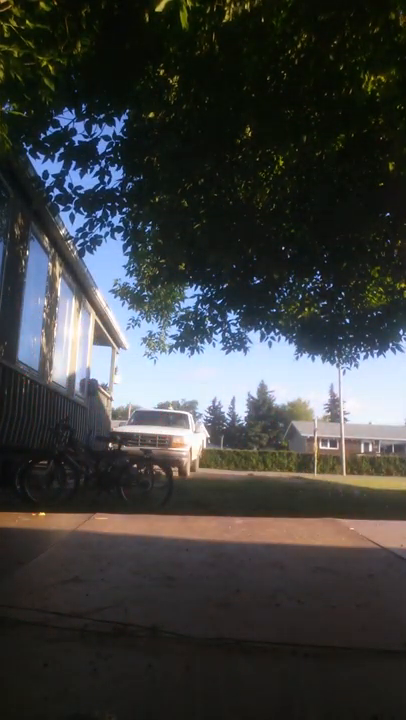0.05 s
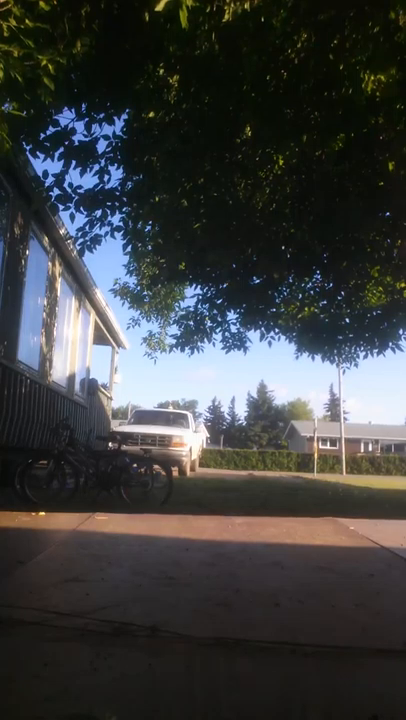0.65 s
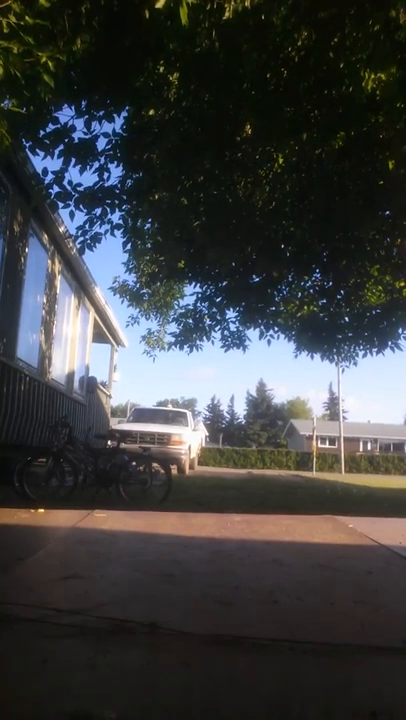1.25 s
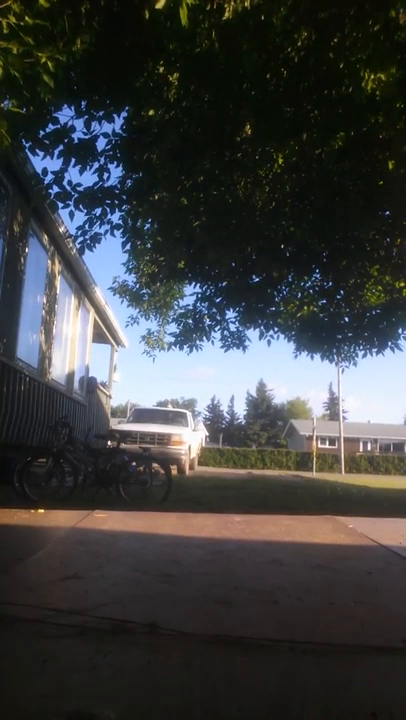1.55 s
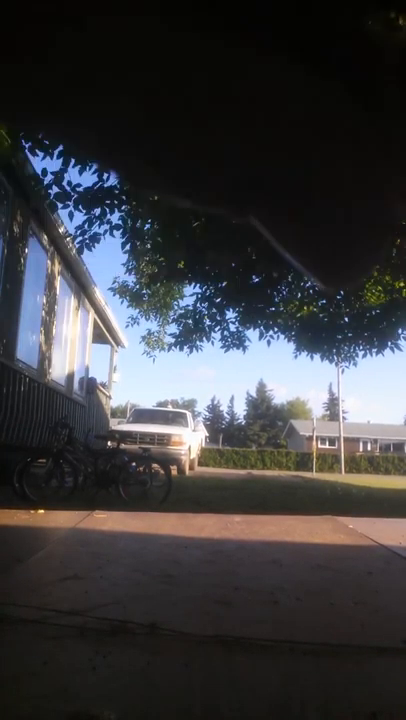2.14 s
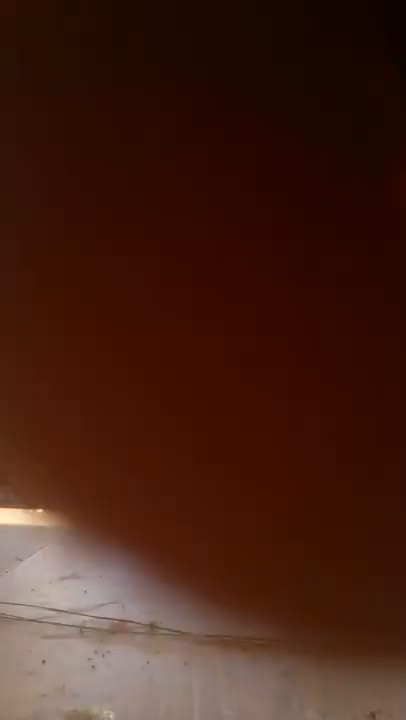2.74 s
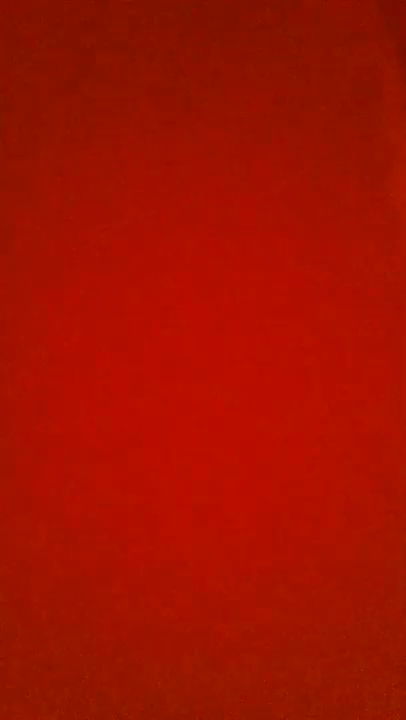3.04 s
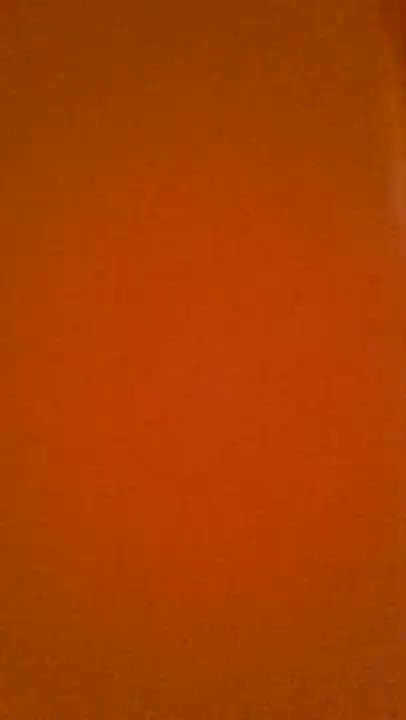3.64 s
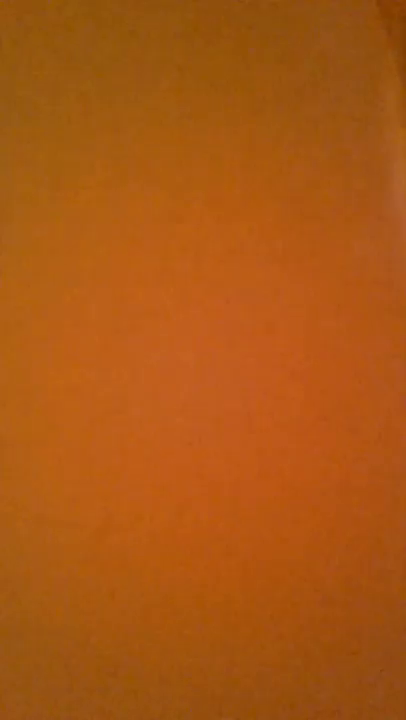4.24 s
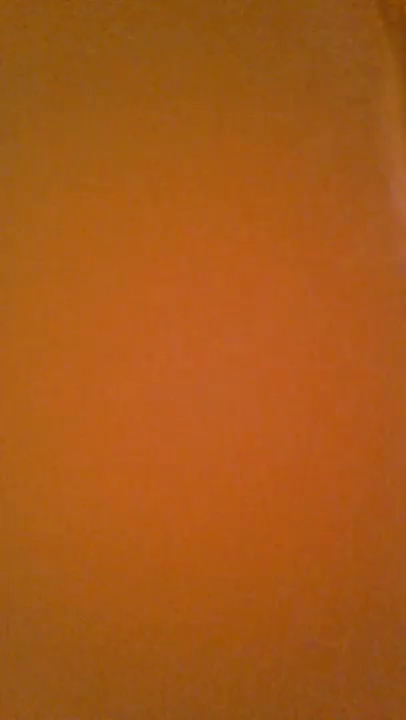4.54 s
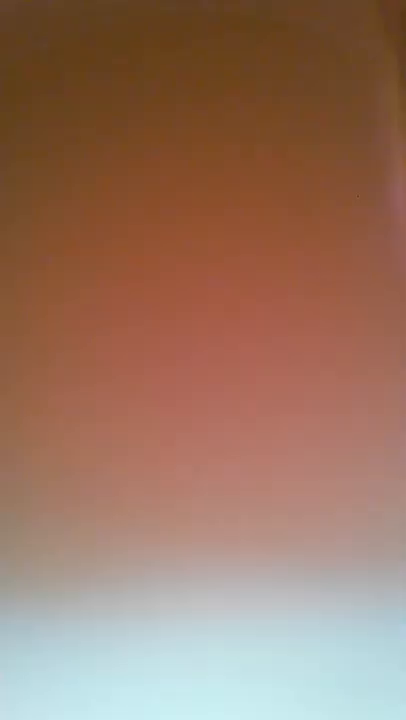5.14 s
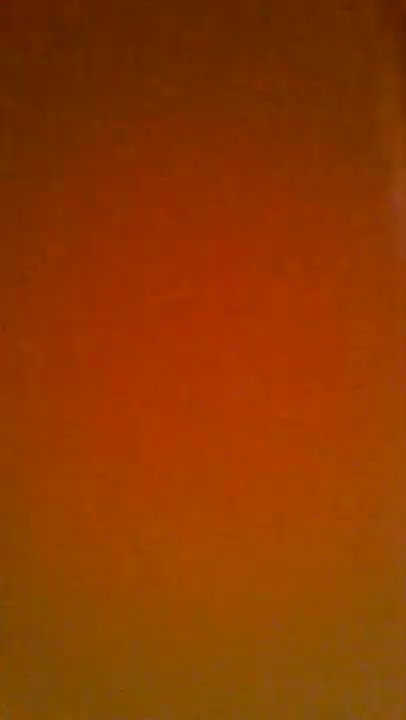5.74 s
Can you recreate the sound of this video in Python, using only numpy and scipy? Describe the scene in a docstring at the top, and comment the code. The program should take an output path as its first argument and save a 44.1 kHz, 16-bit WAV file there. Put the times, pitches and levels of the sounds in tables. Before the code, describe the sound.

Close handling noise on a phone: cloth rustle, a bump, skin rubbing and clicking, then loud wipes, while an engine idles far away.

```python
"""A phone stands on a driveway; a distant engine idles throughout. 0.1-2.4 s: a sleeve brushes its two
microphone ports, a far bird calls once, a hand bumps the case. 2.3-4 s: fingers touch and grip; skin
rubs and creaks, the case clicks and knocks. 4-5 s: two hard wipes cross the left port, the second
sounding an air pocket under the finger. From 5 s: the fingers settle and muffle the street."""
import sys
import numpy as np
from scipy import signal
from scipy.fft import rfft, irfft, next_fast_len
from scipy.io import wavfile
from scipy.ndimage import uniform_filter1d, map_coordinates

SR = 44100
rng = np.random.default_rng(int(sys.argv[2]) if len(sys.argv) > 2 else 0)


def transcribe(signal):
    """Save signal, clipped to [-1, 1], as a 16-bit WAV file at the path in sys.argv[1]."""
    frames = np.atleast_2d(signal).T
    limited = np.clip(frames, -1, 1)
    pcm = np.round(limited * 32767).astype(np.int16)
    wavfile.write(sys.argv[1], SR, pcm)


N = 264710
TIME_S = np.arange(N) / SR
SETTLED_S = 5.0  # fingers come to rest over the ports


# Wipe paths: t/s, hiss/dB, left minus right/dB, rumble/dB. All table levels are relative.
FIRST_WIPE = [(4.0, -37, 1.0, -37.5), (4.017, -23, 5.1, -45), (4.039, -36, 2.2, -41.5),
              (4.07, -21, 7.3, -43.5), (4.14, -22.3, 9.9, -47), (4.187, -29, 5, -37.5),
              (4.229, -24, 14, -42.5), (4.281, -43.5, 4.1, -48.5), (4.327, -44.5, 7.1, -39),
              (4.337, -33.5, 5.6, -44), (4.395, -50, 9.5, -61)]
SECOND_WIPE = [(4.398, -40, 12.0, -59), (4.414, -19.5, 17, -36), (4.474, -18.5, 15.5, -33),
               (4.51, -23.5, 15, -41.5), (4.564, -19.5, 22.5, -47), (4.61, -35.5, 7, -52.5),
               (4.7, -27.5, 13.5, -43), (4.754, -33, -2, -45), (4.804, -32.5, -4, -36),
               (4.844, -45, 14, -49), (4.882, -47, 0.5, -52.5), (4.976, -48.5, 5, -70),
               (5.015, -70, -3.0, -69)]
# Wipe spectra: f/Hz, left/dB, right/dB
FIRST_WIPE_SPECTRUM = [(500, -21, -28), (1400, -18, -15), (2170, -12.5, -21), (3200, -15, -9),
                       (4270, -20, -7), (4960, -6, -18), (6200, 1.5, 3), (7540, -10.5, -1), (8540, -11, -4),
                       (10600, -14, -5), (15000, -24, -19)]
SECOND_WIPE_SPECTRUM = [(500, -21, -8.5), (1400, -12.5, -13), (2120, -17.5, -3.5), (3200, -9.5, -10.5),
                        (4280, -8, -6), (5200, -0.5, -6.5), (6200, 1.5, -2), (7500, -6, -1.5),
                        (10900, -9, -8.5), (15000, -12, -17)]
def wipes():
    """Skin slides, then drags hard across the left port."""
    slide = rub(path_gains(FIRST_WIPE, lean_db=-0.5), FIRST_WIPE_SPECTRUM, grain_db=1.2, flutter_db=1.8)
    drag = rub(path_gains(SECOND_WIPE, lean_db=-5.5), SECOND_WIPE_SPECTRUM, grain_db=1, flutter_db=1.6)
    return slide + drag


# Grip path: t/s, hiss/dB, left minus right/dB, rumble/dB
GRIP_PATH = [(3.1, -54, 0.5, -46), (3.238, -47.5, -5, -48.5), (3.442, -41.5, 1.5, -49),
             (3.554, -44, -1.5, -44.5), (3.608, -37.5, -3, -37), (3.64, -43, -1, -42),
             (3.676, -36.2, -6.0, -42), (3.818, -38.5, 5, -40), (3.86, -43.5, -2, -43),
             (3.995, -45.5, 3, -59)]
# Light touches: t/s, length/s, hiss/dB, left minus right/dB, rumble/dB
FINGER_TOUCHES = [(2.347, 0.058, -41, -12, -48), (2.401, 0.25, -44, -8.5, -51),
                  (2.656, 0.082, -60, -7, -53), (2.799, 0.26, -50, -8, -58), (5.019, 0.073, -52, -6, -64),
                  (5.139, 0.088, -49, -11, -67), (5.212, 0.092, -45.5, -13.5, -71),
                  (5.294, 0.437, -57, -1.5, -75), (5.4, 0.033, -52, -28, -82),
                  (5.679, 0.16, -50.5, 2, -57.5), (5.828, 0.16, -45, -2.5, -52.5)]
# Skin spectra before and after settling: f/Hz, left/dB, right/dB
GRIP_SPECTRUM = [(500, -6, -31), (1400, -7.5, -7), (2180, -13.5, -5), (3600, -5, -5), (5200, -1.5, -3),
                 (6200, 2.5, -4.5), (6960, -2, 3.5), (8870, -10, -5), (11000, -16, -10.5),
                 (15100, -19, -15.5)]
SETTLED_SPECTRUM = [(800, -3.5, -22), (1150, -5, -19), (1830, -8, -17), (2210, 2.5, -9.5),
                    (3200, -5, -11.5), (5200, -5, -5.5), (6200, -2.5, -2), (7050, -3, 1), (8500, 1.5, -3),
                    (11000, -8, -10), (15000, -14, -14)]
def fingers(lean_db=1.5):
    """Fingers touch, work into a grip and settle; the pressed skin creaks."""
    touch = sum(contact_gains(hiss_db, pan_db, rumble_db, lean_db)[..., None]
                * envelope(start_s, length_s, attack_s=0.019, t60_s=0.12, sag_db=0.26)
                for start_s, length_s, hiss_db, pan_db, rumble_db in FINGER_TOUCHES)
    grip = path_gains(GRIP_PATH, lean_db=-6)
    settled = TIME_S > SETTLED_S
    gripping = rub(grip + touch * ~settled, GRIP_SPECTRUM, grain_db=1.5, flutter_db=2)
    settling = rub(touch * settled, SETTLED_SPECTRUM, grain_db=0.5, flutter_db=0.4)
    pressure = touch[1] + grip[0]  # touch rumble gain + grip hiss gain
    return gripping + settling + pressure * skin_creak()


# Sleeve swings: t/s, length/s, hiss/dB, rumble/dB
SLEEVE_SWINGS = [(0.108, 0.078, -44, -51), (0.276, 0.27, -52, -55), (0.56, 0.1, -48, -46),
                 (0.73, 0.13, -54, -81), (0.837, 0.08, -48, -48.5), (0.906, 0.055, -42, -37.5),
                 (1.015, 0.19, -40.5, -47.5), (1.327, 0.094, -48, -65), (1.453, 0.061, -43.5, -55),
                 (1.586, 0.15, -55, -56), (1.71, 0.079, -48, -54.5), (1.874, 0.13, -50.5, -50.5),
                 (2.019, 0.18, -48.5, -52), (2.23, 0.13, -51.5, -57)]
# Cloth spectrum at the ports: f/Hz, left/dB, right/dB
SLEEVE_SPECTRUM = [(493, -20, -12.5), (1200, -3.5, -10), (2050, -11, -7), (3200, -6.5, -7.5),
                   (4030, -7, -6), (4970, -3, -2.5), (6200, 1, -2), (7000, -6.5, 2), (8900, -12, -6),
                   (10700, -16, -10), (15100, -19.5, -15.5)]
def sleeve(pan_db=0, lean_db=5):
    """Cloth brushes both ports, starting softly and trailing off slowly."""
    gains = sum(contact_gains(hiss_db, pan_db, rumble_db, lean_db)[..., None]
                * envelope(start_s, length_s, attack_s=0.03, t60_s=0.37, sag_db=0.36)
                for start_s, length_s, hiss_db, rumble_db in SLEEVE_SWINGS)
    return rub(gains, SLEEVE_SPECTRUM, grain_db=1.5, flutter_db=1.6)


def rub(gains, spectrum, grain_db, flutter_db):
    """Friction hisses separately at each port, flutters with hand speed and rumbles through the case."""
    hiss_gain, rumble_gain = gains
    flutter = unit(amp(flutter_db * wobble(55)))
    hiss = cupped(coloured(friction(0, grain_db, slip_hz=1400), spectrum))
    return hiss_gain * flutter * hiss + rumble_gain * case_rumble()


# Case-borne spectrum: f/Hz, level/dB
RUMBLE_SPECTRUM = [(50, -38), (120, 1), (250, 4.5), (420, -3), (650, -3.5), (1300, -13.5), (2200, -15.5),
                   (4500, -33)]
def case_rumble(catches_per_s=45, catch_db=-7):
    """A sliding contact catches now and then; the case carries the low part to both ports."""
    chance, size = rng.random((2, N))
    catches = (chance < catches_per_s / SR) * (0.42 + size) * np.sign(noise(shared=0.6))
    force = friction(shared=0.51, grain_db=3.5, slip_hz=110) + amp(catch_db) * unit(catches)
    return through_case(cupped(coloured(force, RUMBLE_SPECTRUM)))


# Snag spectrum: f/Hz, level/dB
CREAK_SPECTRUM = [(200, -20), (600, 0), (1300, 1.5), (2300, -1.5), (4000, -13.5), (7000, 1.5), (15000, -33)]
def skin_creak(snags_per_s=110, spread_db=5):
    """Dry skin snags on a port rim: tiny ticks of uneven size."""
    snags = rng.random(N) < snags_per_s / SR
    sizes = amp(spread_db * np.clip(rng.standard_normal((2, N)), -2, 2))
    return amp(-8) * coloured(snags * sizes, CREAK_SPECTRUM)


# Soft bumps: t/s, left/dB, right/dB, f/Hz, t60/s
BUMPS = [(0.576, -20.5, -25, 75, 0.059), (0.639, -27.5, -31, 55, 0.11), (0.958, -2.5, -5.5, 98, 0.051),
         (.96, -11.5, -24, 212, 0.051), (1.002, -18.5, -24.5, 55.7, 0.17), (1.916, -23, -28, 58, 0.074),
         (2.366, -29, -15.5, 115, 0.027), (3.981, -14.5, -25, 194, 0.031), (4.727, -23, -16, 142, 0.044),
         (5.059, -33, -45, 71.7, 0.2)]
def bumps(attack_s=0.0021):
    """The whole phone rocks for a few slow cycles."""
    out, t = np.zeros((2, N)), np.arange(SR // 3) / SR
    for start_s, left_db, right_db, hz, t60_s in BUMPS:
        swing = -np.sin(2 * np.pi * hz * t) * amp(-60 * t / t60_s) * (1 - np.exp(-t / attack_s))
        add(out, start_s, stereo(left_db, right_db) * swing)
    return out


# Case ticks: t/s, left/dB, right/dB, f/Hz
CASE_CLICKS = [(0.5964, -31, -26, 5400), (0.9977, -17, -17, 2700), (1.743, -28, -23, 2970),
               (1.858, -32.5, -30, 7140), (2.0096, -26.5, -43, 6200), (2.3023, -17.5, -20, 5500),
               (2.506, -32, -21, 7700), (2.8714, -31, -31, 4960), (3.449, -23, -21.5, 2600),
               (3.465, -26.5, -25, 6860), (3.559, -28, -21.5, 2300), (3.602, -27, -13, 6300),
               (3.6808, -14.5, -12.5, 6850), (3.7502, -18, -18, 6800), (3.7635, -19, -20, 7000),
               (3.802, -20.5, -20.5, 5530), (3.8187, -17.5, -24, 6350), (3.898, -21.5, -27, 6400),
               (3.9416, -25, -27, 6200), (3.981, -10.5, -11.5, 7900), (4.045, -14, -26, 6690),
               (4.1814, -10.5, -9, 9000), (4.3408, -12, -32, 9600), (4.748, -18, -27, 2810)]
def clicks(t60_s=0.0086, tail_t60_s=0.015, tail_db=-20, width_ratio=0.31, skirt_db=-12, lowpass_hz=13000):
    """A snap and a tiny crack ring the case briefly at each tick's pitch."""
    out, t = np.zeros((2, N)), np.arange(SR // 40) / SR
    f = np.fft.rfftfreq(len(t), 1 / SR)
    snap = 2.4 * (t == 0)
    decay = amp(-60 * t / t60_s) + amp(tail_db - 60 * t / tail_t60_s)
    for start_s, left_db, right_db, hz in CASE_CLICKS:
        crack = snap + noise(shared=0.08, size=len(t)) * decay
        response = (resonance(f, hz, width_ratio * hz) + amp(skirt_db)) / (1 + (f / lowpass_hz) ** 2)
        tick = unit(irfft(rfft(crack) * response, len(t)))
        add(out, start_s, stereo(left_db, right_db) * tick)
    return amp(-16) * out


# Fingertip knocks: t/s, left/dB, right/dB, f/Hz
FINGER_KNOCKS = [(0.9658, -23.5, -30, 724), (1.8748, -31, -32.5, 510), (2.093, -24.5, -26, 940),
                 (2.0999, -28.5, -30, 800), (2.3026, -26.5, -31, 1450), (2.303, -30.5, -36, 540),
                 (2.873, -28, -30, 564), (3.4485, -26.5, -28, 1150), (3.54, -37, -33, 800),
                 (3.558, -37, -28, 900), (3.602, -25.5, -29, 310), (3.7783, -24, -27, 850),
                 (3.9849, -23, -29, 245), (4.0452, -24.5, -27.5, 307), (4.1838, -27, -37, 330),
                 (4.3103, -31.5, -33, 1340), (4.337, -30, -35, 260), (4.408, -24.5, -36, 283),
                 (4.411, -24, -35, 1400), (4.741, -24, -24, 250), (4.811, -30.5, -28.5, 550),
                 (5.077, -45, -46, 750), (5.244, -39, -39, 635), (5.778, -41.5, -48, 1290),
                 (5.8193, -39, -52, 1280), (5.8347, -38, -46, 1200), (5.8736, -34.5, -39, 520)]
def knocks(t60_s=0.0074, rattle_cycles=20, width_ratio=0.82, rattle_db=-2, skew_rad=0.62):
    """One heavily damped swing of the case plus a dull rattle, shorter at higher pitch."""
    out, t = np.zeros((2, N)), np.arange(SR // 12) / SR
    f = np.fft.rfftfreq(len(t), 1 / SR)
    for start_s, left_db, right_db, hz in FINGER_KNOCKS:
        phase = skew_rad * rng.standard_normal() * np.array([[1], [-1]])  # case flex: ports out of step
        swing = unit(np.sin(2 * np.pi * hz * t + phase) * amp(-60 * t / t60_s) * (1 - np.exp(-6 * hz * t)))
        chatter = noise(shared=0.69, size=len(t)) * amp(-60 * t * hz / rattle_cycles)
        rattle = unit(irfft(rfft(chatter) * resonance(f, hz, width_ratio * hz) ** 2, len(t)))
        add(out, start_s, stereo(left_db, right_db) * unit(swing + amp(rattle_db) * rattle))
    return amp(-11.5) * through_case(out)


# Finger scuffs: t/s, length/s, left/dB, right/dB, rasp/dB
FINGER_SCUFFS = [(0.577, 0.022, -41.5, -52, 6), (0.962, 0.014, -31.5, -33, 0),
                 (0.961, 0.051, -29.5, -29.5, -18), (1.446, 0.066, -34, -35.5, -30),
                 (2.091, 0.016, -33, -32, -7), (2.146, 0.023, -22, -21, -6.5),
                 (2.362, 0.045, -44, -36, -20), (4.007, 0.026, -29, -36, -30),
                 (4.403, 0.013, -27.5, -35, 0.5), (4.737, 0.01, -35, -28.5, 3)]
# Scuff hiss spectrum: f/Hz, level/dB
SCUFF_SPECTRUM = [(500, -9), (1400, -7), (3500, -7), (6300, 5.5), (9000, -3.5), (15000, -18.5)]
def scuffs():
    """Quick finger brushes: bright hiss over a dull, case-borne rasp."""
    hiss = coloured(friction(0, grain_db=1.5, slip_hz=810), SCUFF_SPECTRUM)
    rasp_hz_db = [(200, -5), (650, 13), (1500, 5.5), (3000, 1.5), (6000, -16)]
    rasp = through_case(coloured(noise(shared=1), rasp_hz_db))
    return sum(stereo(left_db, right_db) * (hiss + amp(rasp_db) * rasp)
               * envelope(start_s, length_s, attack_s=0.003, t60_s=0.037, sag_db=2)
               for start_s, length_s, left_db, right_db, rasp_db in FINGER_SCUFFS)


# Air pocket resonances: f/Hz, width/Hz, level/dB
POCKET_MODES = [(403, 135, -15.5), (890, 250, -13), (1700, 290, -2)]
# Tuning as the finger rolls: t/s, pitch ratio
POCKET_TUNING = [(4.5, 1.02), (4.6, 0.98), (4.78, 1.06)]
def air_pocket(peak_s=4.485, close_db_per_s=357, open_db_per_s=111):
    """Air under the finger resonates: the pocket closes fast, opens slowly and lingers with the drag."""
    out, t = np.zeros((2, N)), TIME_S - peak_s
    tuning = np.interp(TIME_S, *np.transpose(POCKET_TUNING))
    drag_gain, _ = path_gains(SECOND_WIPE, lean_db=0)
    linger = amp(-12) * drag_gain.mean(axis=0) * (t > 0)
    for hz, width_hz, db in POCKET_MODES:
        fade_db_per_s = open_db_per_s * np.sqrt(hz / POCKET_MODES[-1][0])
        swell = amp(-18.5 - np.maximum(-close_db_per_s * t, fade_db_per_s * t))
        out += amp(db) * np.maximum(swell, linger) * noise_band(hz * tuning, width_hz, shared=0.47)
    return stereo(0, -7) * out


# Fingertip drag: t/s, f/Hz, level/dB
GROAN_PATH = [(3.33, 270, -40), (3.39, 669.6, -41), (3.44, 600, -47), (3.455, 595, -30), (3.478, 580, -42)]
def groan():
    """Skin drags slowly over the case; one dull resonance rises as it presses in."""
    times_s, hz, db = np.transpose(GROAN_PATH)
    gain = uniform_filter1d(levels(np.transpose([times_s, db]))[0], size=200)
    return stereo(0, -3) * gain * noise_band(np.interp(TIME_S, times_s, hz), width_hz=190, shared=0.87)


# Rim resonances: f/Hz, width/Hz, left/dB, right/dB
RIM_MODES = [(1800, 280, -38, -35.5), (6350, 1460, -26, -22), (10000, 6000, -36, -24)]
def nail_ping(start_s=5.3195, length_s=0.0069):
    """A nail flicks the rim once, sounding a few high resonances."""
    out, size = np.zeros((2, N)), int(length_s * SR)
    for hz, width_hz, left_db, right_db in RIM_MODES:
        ring = unit(noise_band(np.full(N, hz), width_hz, shared=0.5)[:, SR:SR + size])
        add(out, start_s, stereo(left_db, right_db) * ring * np.hanning(size))
    return out


# Bird call: t/s, length/s, f/Hz, level/dB
BIRD_CALLS = [(0.758, 0.1, 4850, -52.5)]
def bird():
    """A far, thin, wavering whistle swells and fades."""
    out, waver = np.zeros((2, N)), 1 + 0.023 * wobble(260)
    for start_s, length_s, hz, db in BIRD_CALLS:
        size = int(length_s * SR)
        call = np.sin(2 * np.pi * hz * np.cumsum(waver[:size]) / SR) * np.hanning(size)
        add(out, start_s, stereo(db, db) * call)
    return out


# Engine tones: f/Hz, level/dB
ENGINE_TONES = [(54, -56.5), (107.7, -52.5), (150.7, -59.5)]
# Street murmur spectrum: f/Hz, level/dB
STREET_SPECTRUM = [(20, -26), (35, -30), (55, -0.5), (90, -0.5), (140, -2.5), (220, -10.5), (500, -18),
                   (800, -17), (1150, -25.5), (2000, -33.5), (8000, -52), (16000, -40)]
# The background sinks after the loud wipes, then recovers: t/s, level/dB
BACKGROUND_LEVEL = [(0, 2), (2.9, -2), (4.4, 1), (4.95, -10.5), (5.55, -13.5), (6, -4)]
def street():
    """A distant engine idles, slightly unsteady, over a low murmur."""
    engine_time_s = np.cumsum(1 + 0.006 * wobble(3.2)) / SR
    hum = sum(amp(db + 0.36 * wobble(4.3)) * np.sin(2 * np.pi * (hz * engine_time_s + rng.random()))
              for hz, db in ENGINE_TONES)
    murmur = amp(-50) * coloured(noise(shared=1), STREET_SPECTRUM)
    return stereo(1, -1) * levels(BACKGROUND_LEVEL) * (np.sqrt(2) * hum + murmur)


def port_hiss():
    """Faint hiss, dipping a little after the loud wipes."""
    return amp(-58) * levels(BACKGROUND_LEVEL) ** 0.36 * coloured(noise(shared=0.049), SLEEVE_SPECTRUM)


def covered(x, lowpass_hz=750):
    """Fingers settled over the ports pass only the lows."""
    shut = uniform_filter1d(1.0 * (TIME_S > SETTLED_S), size=4000)
    return (1 - shut) * x + shut * filtered(x, lambda f: 1 / (1 + (f / lowpass_hz) ** 10))


def through_case(x, dip_hz=928, width_hz=174, depth=0.45):
    """The case passes less between two of its resonances."""
    return filtered(x, lambda f: 1 - depth * resonance(f, dip_hz, width_hz))


def cupped(x, spread_db=2.5):
    """Gaps between hand and case keep changing, so resonances come and go."""
    spectra = signal.stft(x, nperseg=512)[2]
    patches = uniform_filter1d(rng.standard_normal(spectra.shape), size=4, axis=1)
    patches = uniform_filter1d(patches, size=14, axis=2)
    return unit(signal.istft(spectra * amp(spread_db * patches / patches.std()), nperseg=512)[1][:, :N])


def contact_gains(hiss_db, pan_db, rumble_db, lean_db, case_pan_share=0.68):
    """Gains (hiss, rumble) x (left, right); the case narrows the rumble's pan and leans it where pressed."""
    def ports(db, balance_db):
        pair = amp([balance_db / 2, -balance_db / 2])
        return 2 * amp(db) * pair / np.linalg.norm(pair, axis=0)
    return np.array([ports(hiss_db, pan_db), ports(rumble_db, lean_db + case_pan_share * pan_db)])


def path_gains(path, lean_db, fade_s=0.0058):
    """Contact gains of one unbroken rub, silent outside it."""
    times_s, *columns = np.transpose(path)
    gate = np.clip(np.minimum(TIME_S - times_s[0], times_s[-1] - TIME_S) / fade_s + 1, 0, 1)
    return contact_gains(*[np.interp(TIME_S, times_s, db) for db in columns], lean_db) * gate


def envelope(start_s, length_s, attack_s, t60_s, sag_db):
    """A stroke gathers speed, slows a little and dies away."""
    t = np.maximum(TIME_S - start_s, 0)
    attack = 1 - np.exp(-(t / attack_s) ** 2)
    return attack * amp(-sag_db * np.minimum(t / length_s, 1) - 60 * np.maximum(t - length_s, 0) / t60_s)


def friction(shared, grain_db, slip_hz):
    """Countless tiny slips: noise in uneven clumps."""
    return unit(noise(shared) * amp(grain_db * wobble(slip_hz)))


def noise_band(hz, width_hz, shared):
    """Noise in one resonance, centre hz given per sample."""
    a, b = (filtered(noise(shared), lambda f: 1 / (1 + (2 * f / width_hz) ** 2)) for _ in range(2))
    phase = 2 * np.pi * np.cumsum(hz) / SR
    return unit(a * np.cos(phase) + b * np.sin(phase))


def noise(shared, size=N):
    """White noise at two ports with a shared fraction of its power."""
    common, *own = rng.standard_normal((3, size))
    return np.sqrt(shared) * common + np.sqrt(1 - shared) * np.array(own)


def wobble(rate_hz):
    """Smooth random curve, rate_hz knots a second."""
    knots = rng.standard_normal(int(N * rate_hz / SR) + 4)
    return map_coordinates(knots, [TIME_S * rate_hz])


def resonance(f, hz, width_hz):
    """Response at f of one damped resonance."""
    return 1j * f * width_hz / (hz * hz - f * f + 1j * f * width_hz)


def filtered(x, response):
    """Apply a frequency response."""
    size = next_fast_len(N + SR // 4)
    return irfft(rfft(x, size) * response(np.fft.rfftfreq(size, 1 / SR)), size)[..., :N]


def coloured(x, spectrum):
    """Shape x by (f/Hz, level/dB, ..) rows on a log axis; rms 1."""
    hz, *columns = np.transpose(spectrum)
    return unit(filtered(x, lambda f: amp([np.interp(np.log(f + 1), np.log(hz), db) for db in columns])))


def levels(rows):
    """Gain per sample from (t/s, level/dB) rows, silent outside them."""
    times_s, *columns = np.transpose(rows)
    return amp([np.interp(TIME_S, times_s, db, left=-np.inf, right=-np.inf) for db in columns])


def amp(db):
    """Decibels to gain."""
    return 10 ** (np.asarray(db) / 20)


def stereo(left_db, right_db):
    """Gain column for the two ports."""
    return amp([[left_db], [right_db]])


def unit(x):
    """Each channel to rms 1."""
    return x / np.sqrt(np.mean(x ** 2, axis=-1, keepdims=True) + 1e-20)


def add(track, start_s, sound):
    """Mix in a stereo sound."""
    part = track[:, round(start_s * SR):][:, :sound.shape[1]]
    part += sound[:, :part.shape[1]]


def scene():
    """Rubs and impacts on the phone, over the background."""
    rubs = wipes() + fingers() + sleeve() + scuffs() + air_pocket() + groan()
    impacts = bumps() + clicks() + knocks() + nail_ping()
    return rubs + impacts + bird() + covered(street()) + port_hiss()


def record(dry, highpass_hz=32, ceiling=0.78, band_limit_hz=15700):
    """The phone's microphones lose deep bass, round off peaks and cut the top band."""
    thinned = signal.sosfilt(signal.butter(2, highpass_hz, "high", fs=SR, output="sos"), dry)
    rounded = thinned / (1 + (thinned / ceiling) ** 8) ** (1 / 8)
    return filtered(rounded, lambda f: f < band_limit_hz)


dry = scene()
out = record(dry)
transcribe(out)
```